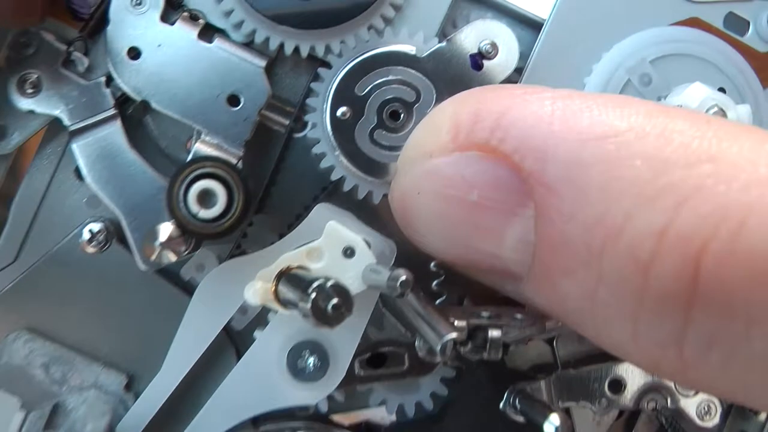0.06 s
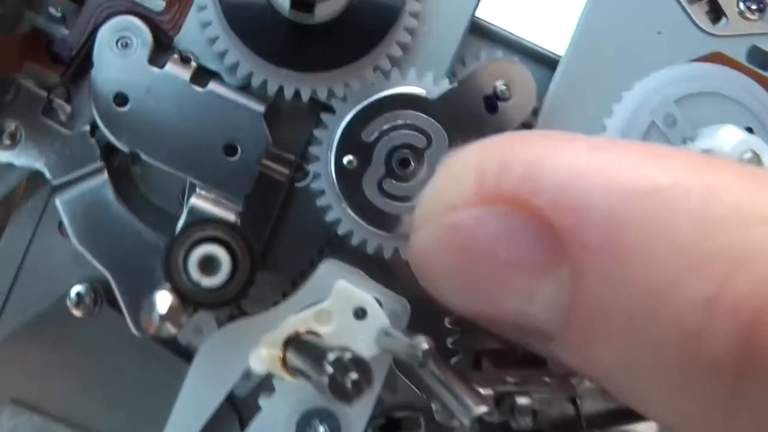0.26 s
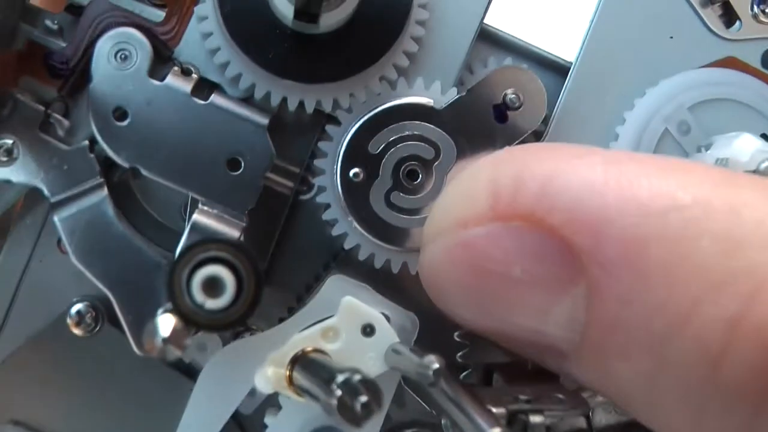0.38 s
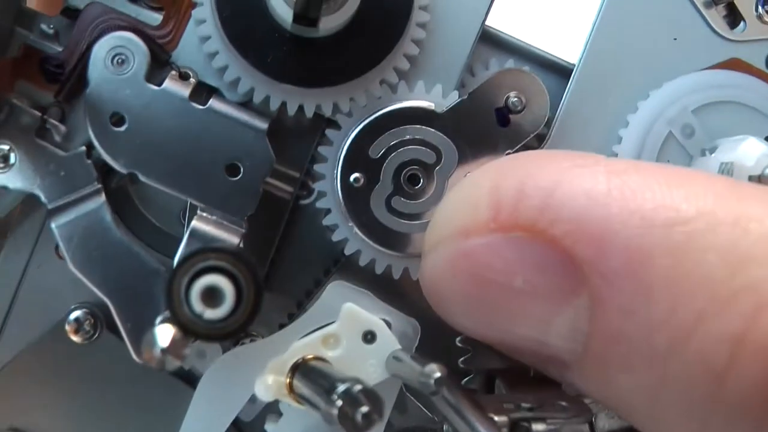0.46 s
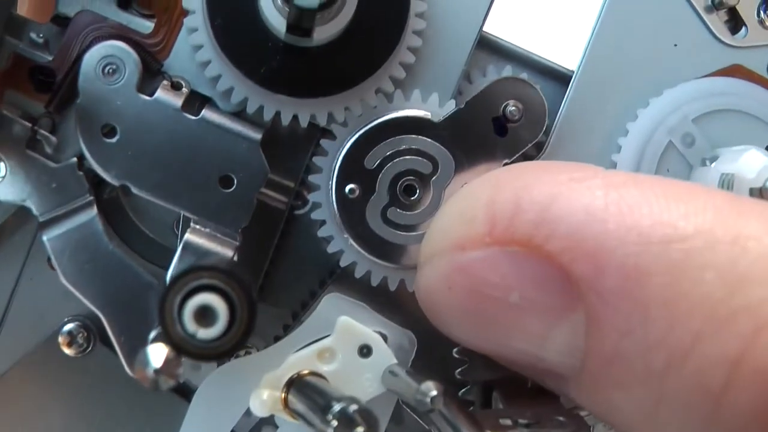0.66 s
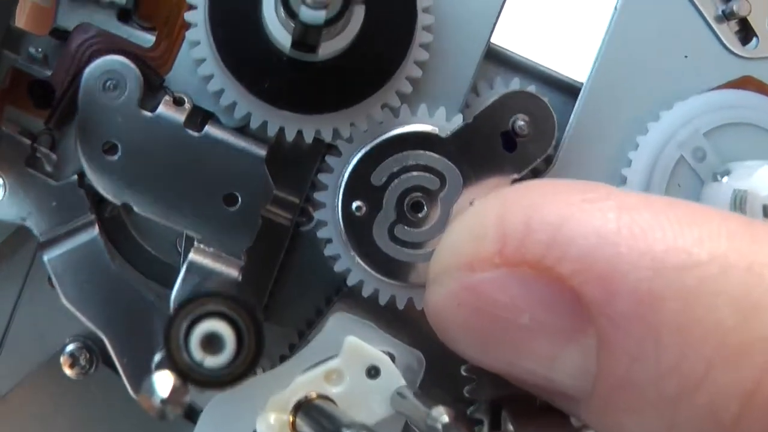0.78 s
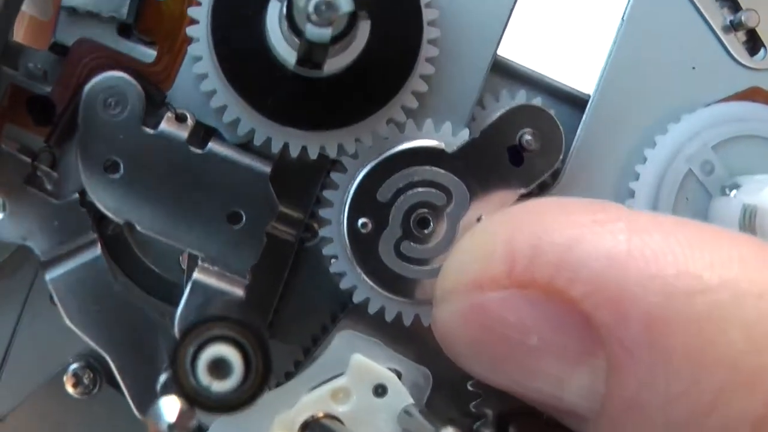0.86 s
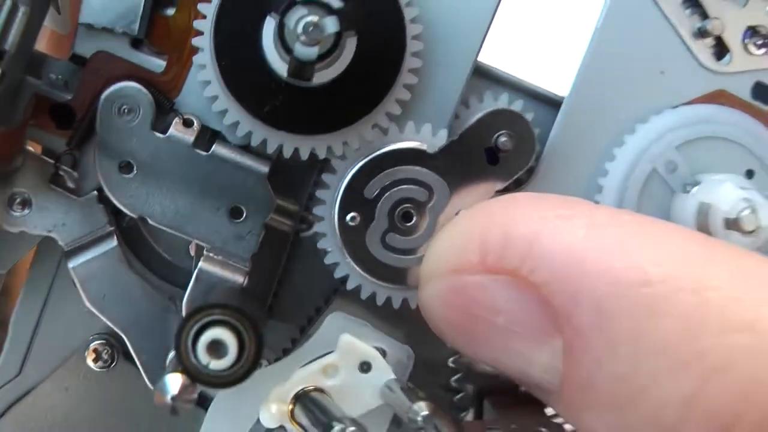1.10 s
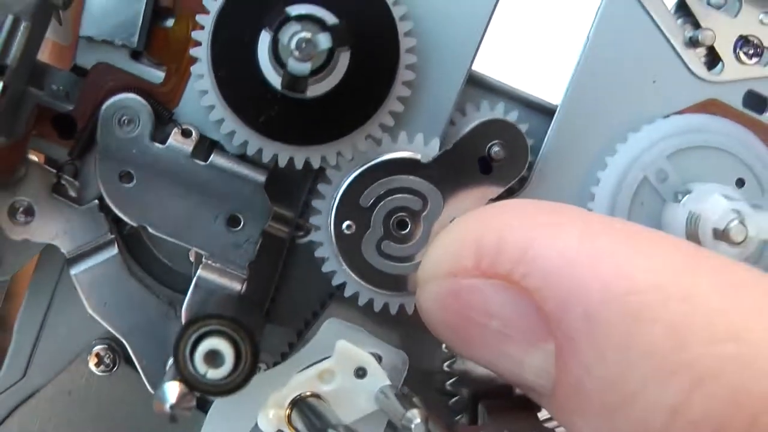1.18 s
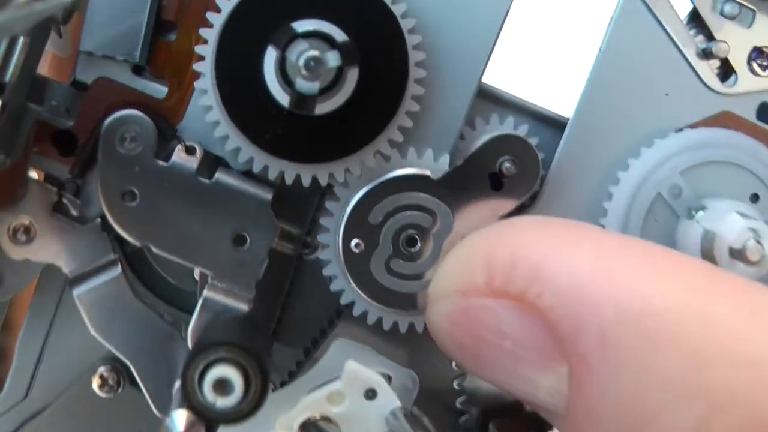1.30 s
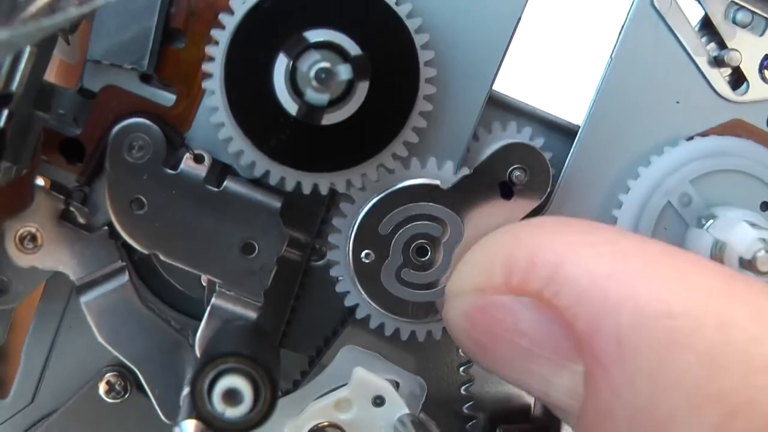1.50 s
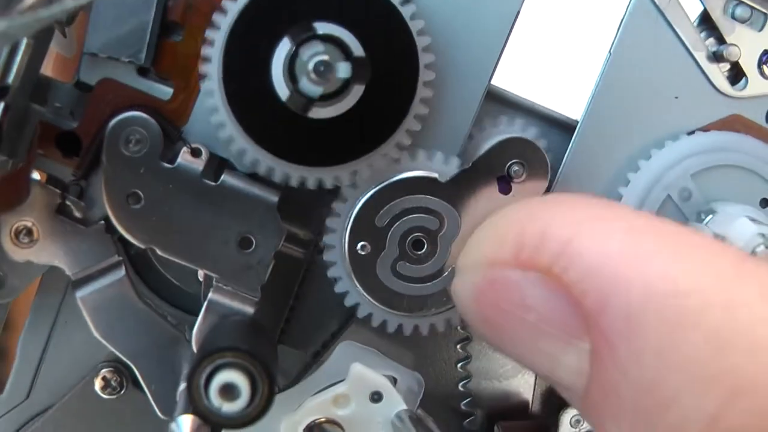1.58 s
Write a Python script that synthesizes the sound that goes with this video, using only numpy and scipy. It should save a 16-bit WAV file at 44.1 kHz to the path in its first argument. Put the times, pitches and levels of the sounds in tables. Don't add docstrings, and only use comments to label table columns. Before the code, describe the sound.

Small plastic gears click and rattle as a thumb pushes an opened tape mechanism, close up

```python
import sys
import numpy as np
from scipy import signal
from scipy.fft import rfft, irfft
from scipy.io import wavfile
from scipy.ndimage import uniform_filter1d

SR = 44100
rng = np.random.default_rng(int(sys.argv[2]) if len(sys.argv) > 2 else 0)


def gain_from_decibels(decibels):
    exponent = np.asarray(decibels, float) / 20
    return 10 ** exponent


def transcribe(signal):
    frames = np.atleast_2d(signal).T
    limited = np.clip(frames, -1, 1)
    pcm = np.round(limited * 32767).astype(np.int16)
    wavfile.write(sys.argv[1], SR, pcm)


N = 72765
RING_N = 4096


def evened(x):
    return x / np.sqrt(np.mean(x ** 2) + 1e-20)


def resonate(x, hz, width_hz):
    turn = np.exp(2j * np.pi * hz * np.arange(len(x)) / SR)
    r = np.exp(-np.pi * width_hz / SR)
    return 2 * (turn * signal.lfilter([1 - r], [1, -r], x / turn)).real


def resonant_noise(hz, width_hz):
    return evened(resonate(rng.standard_normal(N), hz, width_hz))


def coloured(points):
    f, db = np.transpose(points)
    hz = np.fft.rfftfreq(N, 1 / SR)
    gain = gain_from_decibels(np.interp(np.log(hz + 1), np.log(f + 1), db))
    return evened(irfft(rfft(rng.standard_normal(N)) * gain, N))


def ring(modes, scatter_db, colour_db=0, detune=0.012):
    rise_cycles = 1.06
    hz, db, t60_s = np.transpose(modes)[:, :, None]
    t = np.arange(RING_N) / SR
    luck = rng.standard_normal((2, len(modes), 1))
    tone = np.sin(2 * np.pi * hz * (1 + detune * luck[0]) * t)
    tone = tone * (1 - np.exp(-(t * hz / rise_cycles) ** 2))
    tone = tone * (-1) ** np.arange(len(modes))[:, None]
    level_db = db + colour_db + scatter_db * luck[1] - 60 * t / np.maximum(t60_s, .003)
    out = (gain_from_decibels(level_db) * tone).sum(0)
    return out / abs(out).max()


def rustle():
    start_s, length_s = 1.545, 0.055
    u = np.clip((np.arange(N) / SR - start_s) / length_s, 0, 1)
    brush = gain_from_decibels(-73) * resonant_noise(8000, 11000)
    squeak = gain_from_decibels(-79) * resonant_noise(9300, 40)
    return np.sin(np.pi * u) * (brush + squeak)


# frequency in Hz, density in dB per Hz.
COMMON_HISS = [(15, -25), (66, -22), (90, -1), (125, -7), (200, -5), (936, -13.5), (1940, -19.5),
               (2280, -18.5), (16000, -36)]
# frequency in Hz, density in dB per Hz.
PORT_DIFFERENCE = [(15, -20), (66, 4.5), (317, 3.5), (384, -0.5), (439, 0), (5880, -27), (7110, -47),
                   (16000, -35)]
# frequency in Hz, level in dB.
WHINE_LINES = [(84, -75), (150.5, -74.5), (557, -80), (930, -78), (1114, -80.5), (2229, -77.5),
               (2977, -84.5), (3400, -85.5)]
# frequency in Hz, level in dB, lean to the left as a ratio.
HUM_LINES = [(24.53, -70, .6), (50, -68.5, 0.62), (151.6, -74, .1), (4830, -85.5, 0)]


def quiet_room():
    whine = 0
    for hz, db in WHINE_LINES:
        width_hz = 0.53 + 0.0022 * hz
        whine = whine + gain_from_decibels(db) * resonant_noise(hz, width_hz)
    hz, db, lean = np.transpose(HUM_LINES)[:, :, None]
    phase = hz * np.arange(N) / SR + rng.random(hz.shape)
    hum = gain_from_decibels(db + 1.5) * np.sin(2 * np.pi * phase)
    mid = gain_from_decibels(-65.5) * coloured(COMMON_HISS) + whine + hum.sum(0) + rustle()
    side = gain_from_decibels(-66) * coloured(PORT_DIFFERENCE) + (lean * hum).sum(0)
    return np.array([mid + side, mid - side])


def table_echo(x):
    t60_s = 0.05
    taps = np.zeros((2, 6000))
    at = np.arange(60, 5960, 20) + rng.integers(0, 20, (2, 295))
    np.put_along_axis(taps, at, rng.choice([-1., 1.], at.shape), 1)
    taps = taps * gain_from_decibels(-60 * np.arange(6000) / SR / t60_s)
    taps = 0.31 * taps[0] + 0.78 * taps
    return signal.fftconvolve(x[None], taps / np.linalg.norm(taps[0]), axes=1)[:, :N]


# start in seconds, level in dB.
ARM_STOPS = [
    (.976, -38.5),
    (.985, -32.5),
    (1.001, -35.5),
]
# frequency in Hz, level in dB, t60 in seconds.
CASE_MODES = [(415, -2, 0.089), (662, 7, 0.043)]


def stops():
    out = np.zeros(N)
    for s, db in ARM_STOPS:
        i = round(s * SR)
        out[i:i + RING_N] += gain_from_decibels(db) * ring(CASE_MODES, 1.55)
    return out * np.array([[1], [-.2]])


# start in seconds, frequency in Hz, level in dB, t60 in seconds.
LOOSE_PARTS = [(0.0406, 9560, -51, 0.003), (0.2124, 4260, -46, 0.017), (0.2134, 11460, -44.5, .01),
               (.218, 1590, -51, 0.011), (.22, 1230, -48, .014), (0.344, 4500, -46, 0.013),
               (.345, 7800, -46, .012), (0.3858, 2520, -33, 0.016), (0.396, 2560, -33, 0.0086),
               (.4043, 5000, -27.5, 0.0059), (0.4023, 8200, -34.5, 0.005), (0.44, 4100, -44, 0.01),
               (.475, 2800, -39.5, 0.012), (0.6187, 3895, -43, 0.025), (0.6185, 5977, -47, 0.025),
               (.6992, 5950, -48.5, 0.0075), (0.7388, 7500, -43, 0.006), (0.976, 4470, -39, 0.012),
               (0.9919, 7300, -32, 0.0066), (1.0171, 2760, -29, 0.0071), (1.0179, 3728, -40, 0.012),
               (1.0173, 6140, -36.5, 0.008), (1.0174, 7580, -35, 0.0097), (1.405, 9700, -66, .006)]


def pings():
    out = np.zeros(N + RING_N)
    for s, hz, db, t60_s in LOOSE_PARTS:
        i = round(s * SR)
        out[i:i + RING_N] += gain_from_decibels(db) * ring([(hz, 0, t60_s)], 0, detune=0)
    return out[:N]


# time in seconds, pressure in dB, frame share in dB, lever share in dB, slips per second.
FIRST_DRAGS = [
    [(.265, -63, -8, 4, 300), (.275, -60.5, -5, 9.5, 318), (.355, -65.5, 0, 0.5, 300),
     (.372, -41.5, 5.5, 1.5, 364), (.39, -47, 0, 15, 493), (.415, -58, 5, 0, 456), (.43, -54, 4, -3, 300),
     (.46, -54.5, 11, 4, 268), (.505, -65.5, 1, 5, 300)],
    [(.585, -62.5, -6, -16, 227), (.63, -61, 8, 4.5, 308), (.665, -59, 3, 4, 312), (.695, -73, 8, -4, 250)],
]
SECOND_DRAGS = [
    [(.698, -60, 20.5, -6, 184), (.735, -52.5, 1, -0.5, 218), (.76, -44.5, 2.5, -1, 246),
     (.795, -50, 9.5, 11, 215), (.805, -50, 8, 4.5, 207), (.83, -50, 5.5, 9, 197),
     (.87, -53.5, 10, 7.5, 168), (.89, -58, 13, 7, 173), (.902, -86, 2, -12, 143)],
    [(.905, -61.5, 16.5, -8, 110.6), (.93, -52, 3, 4, 183), (.943, -44, 0, 5, 250),
     (.955, -42.5, -3, 8.5, 314), (.97, -49.5, 6, 10, 411), (.99, -44, -3.5, 8, 365),
     (1.008, -50, 4, -16, 494), (1.025, -52, -5, 2.5, 554), (1.06, -78, -9, 4, 443)],
]
# frequency in Hz, level in dB, t60 in seconds.
RUBBED_FRAME_MODES = [(790, -10, 0.067), (873, 4, 0.062), (1038, 8, 0.024), (942, 1.5, 0.037)]
RUBBED_GEAR_MODES = [(1475, 1, 0.01), (1807, 2.5, 0.013), (2244, 5, 0.017), (2635, -1, 0.025),
                     (2760, 0, 0.022), (2960, -1.5, 0.016), (3817, -5.5, 0.04)]
RUBBED_LEVER_MODES = [(4325, -3, 0.013), (4630, -3, 0.011), (4800, -0.5, 0.011), (5415, 0, 0.01),
                      (5730, -1, 0.0094), (6240, 3.5, 0.009), (7160, -1, 0.0073), (8200, -5, .01),
                      (9060, -7, 0.0047), (10450, -8.5, 0.011), (11760, -9, 0.01), (13900, -20, .007)]
# frequency in Hz, level in dB, t60 in seconds.
PIN_MODE = (13160, -11.5, 0.0035)


def drags():
    slip_jitter, slip_scatter_db, scrape = .35, 3.5, 0.47
    lever_tilt_db_per_oct, pin_from_s = -8, .93
    t = np.arange(N) / SR
    controls = np.zeros((4, N))  # frame, gear, lever levels; slips per s
    for rows in FIRST_DRAGS + SECOND_DRAGS:
        s, db, frame_db, lever_db, rate = np.transpose(rows)
        on = (t >= s[0]) & (t < s[-1])
        level = gain_from_decibels(np.interp(t, s, db)) * on
        frame_level = level * gain_from_decibels(np.interp(t, s, frame_db))
        lever_level = level * gain_from_decibels(np.interp(t, s, lever_db))
        controls += [frame_level, level, lever_level, np.interp(t, s, rate) * on]
    rate = controls[3]
    wobble = evened(uniform_filter1d(rng.standard_normal(N), 200))
    turns = np.cumsum(rate * np.maximum(1 + slip_jitter * wobble, .1)) / SR
    slip = np.diff(np.floor(turns), prepend=0) * np.sqrt(SR / np.maximum(rate, 50))

    parts = []
    for modes, level in zip((RUBBED_FRAME_MODES, RUBBED_GEAR_MODES, RUBBED_LEVER_MODES), controls):
        part = 0
        for mode in modes:
            luck = rng.standard_normal((2, N))
            strike = ring([mode], 0, detune=0) * gain_from_decibels(mode[1])
            if modes is RUBBED_LEVER_MODES:
                strike = strike * gain_from_decibels(lever_tilt_db_per_oct * np.log2(mode[0] / modes[0][0]))
            drive = slip * gain_from_decibels(slip_scatter_db * luck[0]) + scrape * luck[1]
            part = part + signal.oaconvolve(drive * level, strike / np.sqrt(100 * len(modes)))[:N]
        parts.append(part)
    pin = (slip + rng.standard_normal(N)) * controls[2] * (t > pin_from_s)
    pin_ring = ring([PIN_MODE], 0) * gain_from_decibels(PIN_MODE[1] - 20.5)
    parts[2] = parts[2] + signal.oaconvolve(pin, pin_ring)[:N]

    thud = np.array([resonant_noise(135, 1110) for _ in range(2)])
    pressure = uniform_filter1d(controls[0] + controls[1], 900)
    return np.array(parts), gain_from_decibels(-13) * pressure * thud


# start in seconds, gear level in dB, frame level in dB, lever level in dB,
# gear pitch in Hz.
FIRST_CLICKS = [(0.0408, -69, -67, -56, 3670), (0.2116, -41.5, -65, -37, 3300),
                (0.215, -48, -41, -46.5, 1560), (0.27, -50, -68, -55, 2300), (0.293, -55, -69, -54.5, 2700),
                (0.3405, -41.5, -30, -49.5, 2200), (0.344, -46, -44, -54, 3730),
                (0.367, -32.5, -24.5, -41, 2200), (0.371, -35, -30, -48, 2200),
                (0.381, -59, -31, -40, 2200), (0.3837, -44, -36, -32, 2620), (0.39, -37, -38, -36, 2600),
                (0.3971, -33.5, -29.5, -27, 2600), (0.4035, -26.5, -22, -21.5, 2140),
                (0.4112, -44.5, -32, -55, 2280), (0.4371, -39.5, -28, -64, 2660),
                (0.4415, -32, -23.5, -39.5, 2380), (0.4591, -45.5, -32.5, -52, 2300),
                (0.474, -38, -23.5, -47, 2640), (0.479, -62, -46, -46, 2320),
                (0.534, -56.5, -47, -75, 2290)]
SECOND_CLICKS = [(0.592, -47.5, -37.5, -70, 2430), (0.6187, -40, -53, -43, 3140),
                 (0.624, -41, -46, -50.5, 2920), (0.647, -44, -54, -49, 2826),
                 (0.6557, -45.5, -55, -49, 2930), (0.681, -45, -62, -50.5, 2240),
                 (0.6991, -33, -36, -43, 2210), (0.716, -42, -32, -54, 2380),
                 (0.7386, -42.5, -26.5, -37, 2600), (0.751, -33.5, -30.5, -38, 2000),
                 (0.7699, -30.5, -33, -41.5, 2279), (0.7753, -41.5, -27.5, -46, 2200),
                 (0.792, -34, -47, -56, 2502), (0.7964, -41.5, -30.5, -56, 2740),
                 (0.856, -44, -33, -49, 2200), (0.926, -50, -25, -53, 2200), (0.977, -35.5, -37, -35, 2920),
                 (0.9842, -35, -45, -33, 2420), (0.9918, -35.5, -44, -28.5, 2700),
                 (1.001, -33.5, -38, -38, 2266), (1.0174, -34, -38.5, -33.5, 2700)]
# frequency in Hz, level in dB, t60 in seconds.
FRAME_MODES = [(905, 0, .042), (1035, -1, .04), (1290, -20, .03), (780, -16, .03)]
GEAR_MODES = [(1560, 0, 0.028), (1805, -33, 0.036), (2200, 4, 0.014), (2383, -1.5, 0.011),
              (2490, -7, 0.029), (2600, -6, 0.015), (2797, 6.5, 0.009), (2970, -25, 0.013),
              (3720, -2.5, 0.015)]
LEVER_MODES = [(3970, 3, 0.0061), (4510, -3.5, 0.0068), (4936, -2, 0.019), (5464, 4, 0.012),
               (5920, -3.5, 0.015), (6720, 0.5, 0.0078), (6920, -0.5, 0.011), (7706, -2.5, 0.01),
               (8200, -3, 0.01), (9450, 3.5, 0.006), (10490, -1.5, 0.015), (11410, -6, 0.012),
               (12900, -6.5, 0.0052)]


def clicks():
    contact_s, scatter_db = 0.0005, 3
    focus_db_per_oct, bright_per_oct = 16, 1
    out = np.zeros((3, N + 8192))
    t = np.arange(256) / SR
    gear_hz = np.array(GEAR_MODES)[:, :1]
    lever_hz = np.array(LEVER_MODES)[:, :1]
    for s, gear_db, frame_db, lever_db, hz in FIRST_CLICKS + SECOND_CLICKS:
        chatter = rng.standard_normal((2, 256)) * np.exp(-t / contact_s)
        focus_db = -focus_db_per_oct * abs(np.log2(gear_hz / hz))
        tilt_db = bright_per_oct * min(lever_db - gear_db, 0) * np.log2(lever_hz / lever_hz[0])
        gear = signal.fftconvolve(ring(GEAR_MODES, scatter_db, focus_db), chatter[0])[:RING_N]
        lever = signal.fftconvolve(ring(LEVER_MODES, scatter_db, tilt_db), chatter[1])[:RING_N]
        edge = np.diff(chatter[1], prepend=0)
        edge_gain = gain_from_decibels(-12.5) * abs(lever).max() / abs(edge).max()
        lever = lever + edge_gain * np.pad(edge, (0, RING_N - 256))
        frame = ring(FRAME_MODES, scatter_db / 2, detune=0.0074)
        parts = [gain_from_decibels(1 + frame_db) * frame,
                 gain_from_decibels(gear_db) * gear / abs(gear).max(),
                 gain_from_decibels(lever_db) * lever / abs(lever).max()]
        i = round(s * SR)
        out[:, i:i + RING_N] += np.array(parts)
    return out[:, :N]


def scene():
    rubbed, thud = drags()
    frame, gear, lever = clicks() + rubbed
    lever = lever + pings()
    frame_band = signal.butter(2, [720, 1300], "bandpass", fs=SR, output="sos")
    frame = signal.sosfilt(frame_band, frame)
    far_face = np.roll(frame - 0.38 * resonate(frame, 798, 208), 2)
    scatter = evened(rng.standard_normal(64)) / 8
    spread = gain_from_decibels(-13.5) * signal.oaconvolve(gear + lever, scatter)[:N]
    left = frame + gear + lever
    right = -gain_from_decibels(-2) * far_face + gain_from_decibels(-2.5) * gear + gain_from_decibels(-1.17) * lever
    near = np.array([left + spread, right - spread])
    echo = gain_from_decibels(-8) * table_echo(gear + lever + gain_from_decibels(-13) * frame)
    return near + echo + thud + stops() + quiet_room()


def top_cut(x):
    return signal.sosfilt(signal.butter(12, 16370, fs=SR, output="sos"), x)


def record(dry):
    band = signal.firwin(1023, [38, 15900], pass_zero=False, fs=SR)
    mix = signal.oaconvolve(dry, band[None], "same")
    return top_cut(mix)


dry = scene()
out = record(dry)
transcribe(out)
```